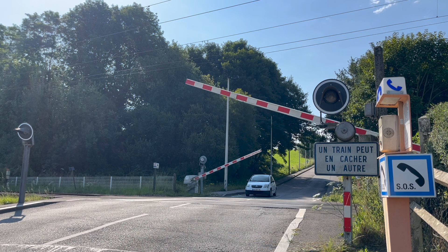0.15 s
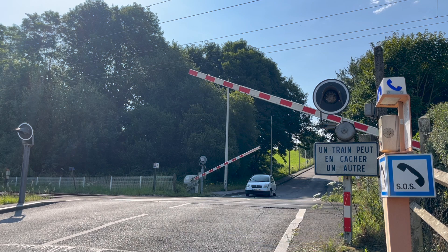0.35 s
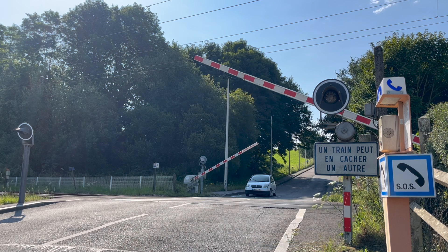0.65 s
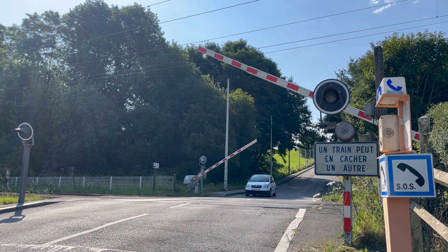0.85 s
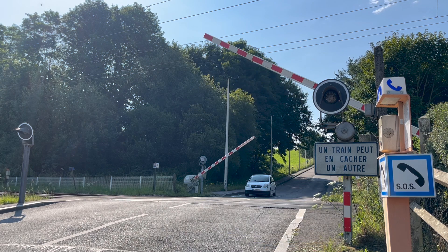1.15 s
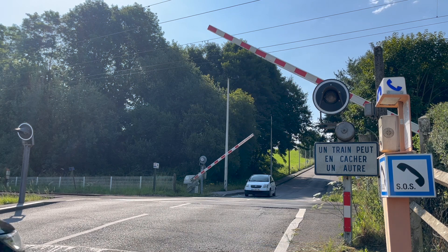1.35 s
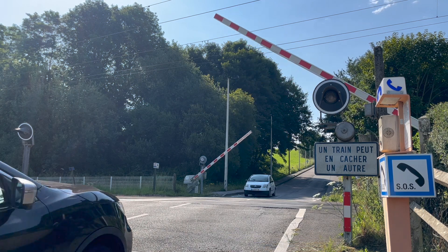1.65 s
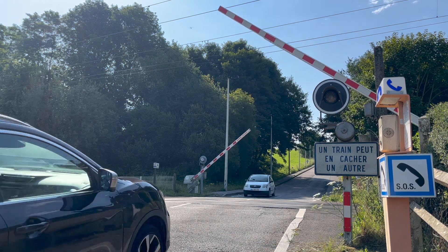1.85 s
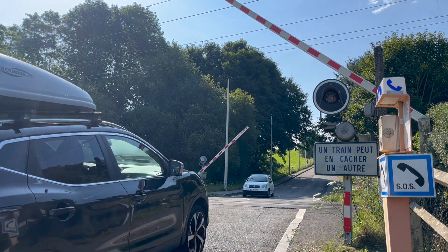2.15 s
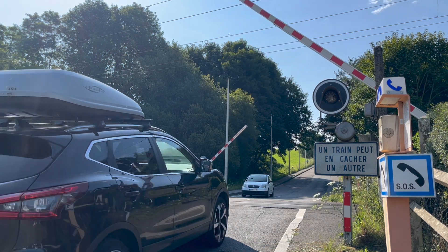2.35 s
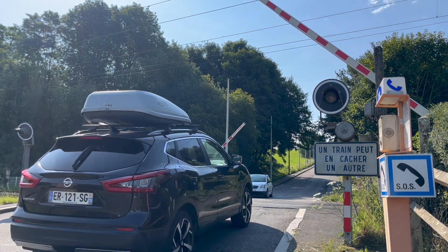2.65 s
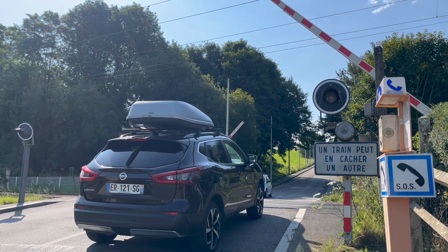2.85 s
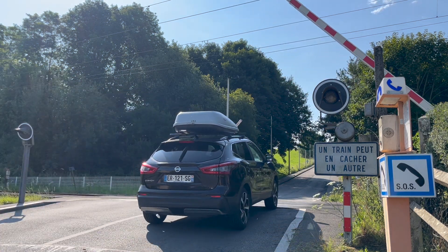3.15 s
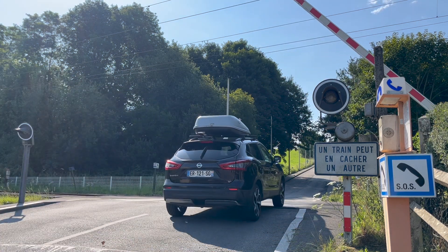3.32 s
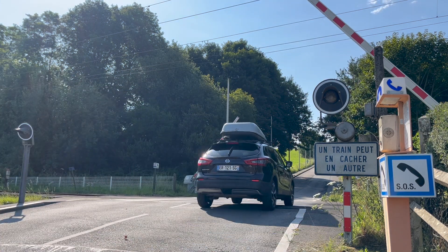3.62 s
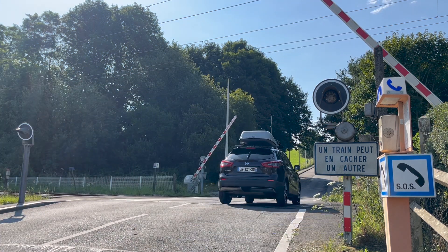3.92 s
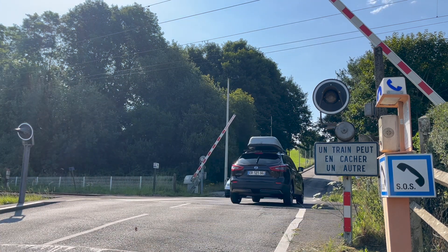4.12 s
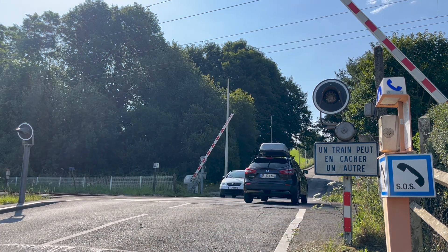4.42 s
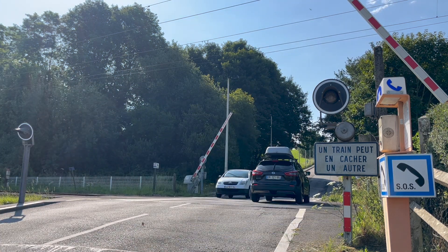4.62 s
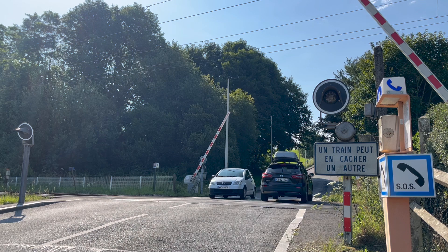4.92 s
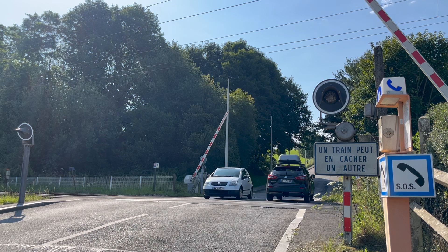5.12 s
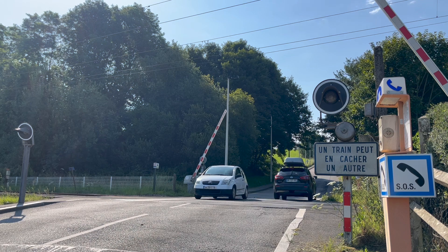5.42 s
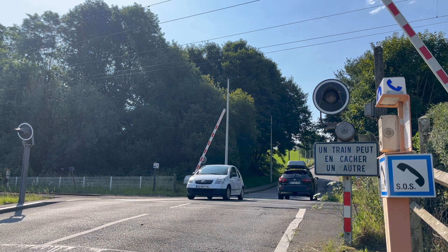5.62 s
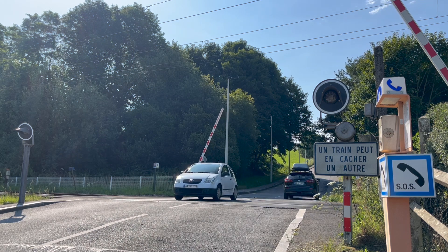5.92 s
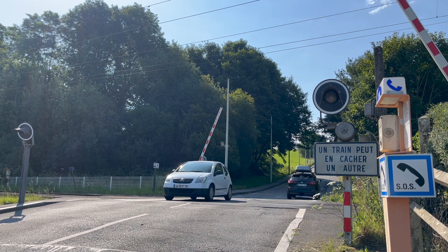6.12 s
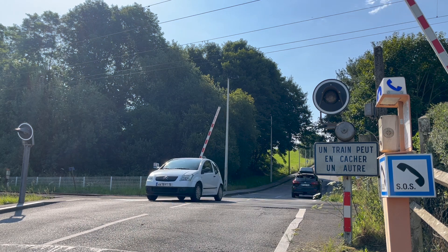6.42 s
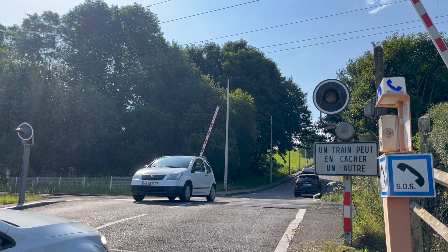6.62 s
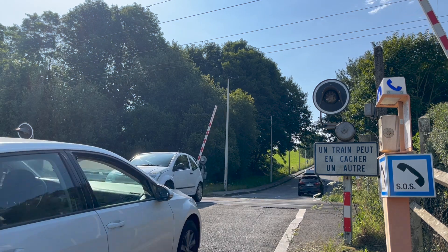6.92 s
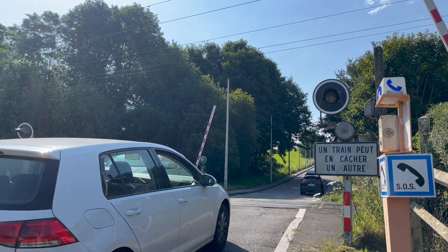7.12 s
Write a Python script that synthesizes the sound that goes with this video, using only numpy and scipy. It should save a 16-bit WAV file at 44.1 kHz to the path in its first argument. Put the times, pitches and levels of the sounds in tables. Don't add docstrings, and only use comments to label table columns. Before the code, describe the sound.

Roadside at a level crossing: an engine accelerates past with hissing tyre roar, then wheels bump heavily on deck and rails as other cars follow.

```python
import sys
import numpy as np
from scipy import signal
from scipy.fft import rfft, irfft, next_fast_len
from scipy.io import wavfile

SR = 44100
rng = np.random.default_rng(int(sys.argv[2]) if len(sys.argv) > 2 else 0)


def nominal_scale(level):
    x = np.asarray(level, float) / 20
    return 10 ** x


def store_pcm(level_fs):
    pcm = np.round(np.clip(level_fs, -1, 1) * 32767).astype(np.int16)
    wavfile.write(sys.argv[1], SR, np.atleast_2d(pcm).T)


N = 320166
STEP = 64

# [f/Hz, side-mid level/dB ahead, the same aside, link ahead/0-1, link aside/0-1, side lead/rad]
PORT_PAIR = [(60, -22, -20.5, .6, .9, 1.5), (140, -20, -13, 0.7, 0.5, 1.5), (370, -9, -2.5, 1, 0.8, 1.5),
             (800, -6, 3.5, 1, 0.5, 1.18), (1260, -1.5, 8, 0, 0.5, 0.9), (1610, 1.5, 7.5, 0, 0.7, 5),
             (1750, -12.5, -4, .3, 0.9, 1.3), (2900, -4, -0.5, .6, 0.6, 1.1),
             (4520, -5, 0.5, 0.82, 0.42, 0.45), (6500, -1.5, -3, 0.15, 0.9, -1.0),
             (7400, 5, 2, 0.4, .5, -1.4), (8300, 2, 0, .5, .5, 2), (9500, -2, -0.5, .5, .5, 1.5),
             (10500, -13, -16, .6, .5, 1.8), (13700, -2, -0.5, .5, .5, -2), (14700, 16, 18, .5, .5, 0)]


def in_time(rows, step=1):
    s, *columns = np.transpose(rows)
    times = np.arange(0, N, step) / SR
    return np.array([np.interp(times, s, c) for c in columns])


def at_hz(points, hz, axis=1):
    points = np.array(points)
    return np.interp(np.log(hz + 1e-9), np.log(points[:, 0]), points[:, axis])


def drift(rate):
    r = np.exp(-2 * np.pi * rate * STEP / SR)
    slow = signal.lfilter([1], [1, -2 * r, r * r], rng.standard_normal(N // STEP + 3001))[3000:]
    return slow / slow.std()


def full_rate(control):
    return np.interp(np.arange(N) / STEP, np.arange(len(control)), control)


def fade(rows, edge_s=0.093):
    t = np.arange(N) / SR
    first, last = rows[0][0], rows[-1][0]
    since_start = t - first + (first < .01)
    until_end = last - t + (last > 7.2)
    return np.clip(np.minimum(since_start, until_end) / edge_s, 0, 1)


def add_at(out, s, event):
    start = int(s * SR)
    out[start:start + len(event)] += event


def orders(rows, wobble_db, stack=((1, 0),), pipe=((1, 0), (2, 0)), wobble_per_s=1.74):
    hz, level_db, *rasp_db = in_time(rows)
    phase = 2 * np.pi * np.cumsum(hz) / SR
    tones = np.zeros(N)
    for k, db in stack:
        tone_db = level_db + db + at_hz(pipe, k * hz)
        tone_db = tone_db + sum(rasp_db) * (k > 3)
        tone_db = tone_db + wobble_db * full_rate(drift(wobble_per_s))
        tones += nominal_scale(tone_db) * np.sin(k * phase + rng.uniform(0, 6.8))
    return np.sqrt(2) * tones * fade(rows), phase


def port_colour(hz):
    # [f/Hz, level/dB]
    mid_null = [(7200, 0.5), (7600, -6.5), (7950, -16), (8850, -15), (9100, -10.5), (9700, -7.5)]
    # [f/Hz, level/dB]
    side_null = [(10800, -0.5), (11150, -16), (11300, -40), (12900, -40), (13100, -9), (13600, -6)]
    mid = nominal_scale(at_hz(mid_null, hz))
    side = nominal_scale(at_hz(PORT_PAIR, hz) + at_hz(side_null, hz))
    return mid, side * np.exp(1j * at_hz(PORT_PAIR, hz, axis=5))


def at_ports(x, aside):
    # [f/Hz, turn/rad]
    ahead_turn = [(60, -0.23), (200, -1.0), (500, 0.26)]
    hz = np.arange(N // 2 + 1) * SR / N
    mid_gain, side_gain = port_colour(hz)
    wider = nominal_scale(at_hz(PORT_PAIR, hz, axis=2) - at_hz(PORT_PAIR, hz))
    turned = side_gain * np.exp(1j * at_hz(ahead_turn, hz))
    mid, ahead, beside = irfft(rfft(x) * np.array([mid_gain, turned, side_gain * wider]), N)
    return np.array([mid, ahead + full_rate(aside) * (beside - ahead)])


def rumble(lumpy_db=-3.0):
    # [t/s, level/dB]
    strength_curve = [(0, -45), (.4, -50), (2.2, -50), (2.7, -45), (3.7, -43), (4.2, -39), (5, -37),
                      (5.4, -38), (6.1, -36), (6.7, -38)]
    # [f/Hz, level/dB per Hz]
    low_colour = [(20, -30), (33, -8), (48, 4.5), (70, 3.5), (100, 2), (150, -16.5), (250, -34)]
    hz = np.arange(N // 2 + 1) * SR / N
    noise = irfft(rfft(rng.standard_normal(N)) * nominal_scale(at_hz(low_colour, hz)) * (hz < 400), N)
    lumps = full_rate(np.clip(drift(9.1), -1.5, 1.5))
    return noise / noise.std() * nominal_scale(in_time(strength_curve)[0] + lumpy_db * lumps)


def traffic():
    # [t/s, tyre level/dB, engine hiss level/dB, engine-bay share/0-1,
    # bearing/0 ahead to 1 left]
    first_pass = [(0, -48.5, -71, 0.92, 1.4), (.27, -47, -70, 1, 1.34), (.5, -45, -65.5, 1, 1.42),
                  (1.0, -44.5, -54.5, 0.35, 1.15), (1.35, -43, -51.5, 0.36, 0.81),
                  (1.85, -40.5, -52, 0.41, 0.25), (2.4, -40.5, -55, 0.38, -0.093),
                  (3.05, -41.5, -58, 0.33, -0.27), (3.7, -46, -65, 0.03, -0.16), (4.4, -52, -75, 0.1, 0.41),
                  (7.26, -68, -85, .3, .2)]
    oncoming_pass = [(0, -80, -88, .4, .6), (3.6, -52, -80, 0.72, 0.43), (4.3, -47.5, -83, 0.39, 0.39),
                     (4.65, -45.5, -77, 0.31, 0.47), (5.15, -44.5, -68.5, 0.36, 0.7),
                     (5.7, -42.5, -67, 0.46, 0.85), (6.1, -44, -66, 0.34, 1), (6.6, -41.5, -64, 0.23, 0.67),
                     (6.95, -41.5, -64, 0.36, 0.33), (7.26, -41, -66, 0.28, .1)]
    follower_pass = [(5.3, -67, -86, 0.55, 0.93), (6.05, -45, -67.5, 0.44, 1),
                     (6.35, -41.5, -57.5, 0.3, 0.82), (6.65, -40, -55.5, 0.25, 0.73),
                     (6.95, -39, -59, 0.29, 0.31), (7.26, -42, -62, 0.066, 0.017)]
    tyre_colours = [
        (1.5, 0, -6, -34),
        (2.5, 0, -6.5, -32),
        (3, 0, -13, -30),
    ]
    hiss_colour = (-17, -11, -10, 0)
    dulling = (0.039, 0.26, 0.4, .9)
    close_db = -39.5
    ridge_bands = [1, 1, 2, 2, 3, 3]
    ridge_strengths = [
        [(-.1, -0.11, 0.3, 0.04, 1, -0.73), (.25, 0.51, 0.091, 0.42, 0.17, 0.25)],
        [(-.05, 0.35, 0.012, -0.62, -0.16, -0.32), (.4, 0.29, 0.22, 0.97, 0.13, .1)],
        [(-.1, .15, .06, -.25, -.4, .05), (.5, .5, .02, 0.04, 0.11, .4)],
    ]
    passes = np.array([in_time(rows, STEP) for rows in (first_pass, oncoming_pass, follower_pass)])
    tyre_db, hiss_db, bay, bearing = passes.transpose(1, 0, 2)[:, :, None]
    distance_db = np.array(dulling)[:, None] * (tyre_db - close_db)
    tyres = tyre_db + np.array(tyre_colours)[:, :, None] + distance_db
    power = nominal_scale(2 * tyres) + nominal_scale(2 * (hiss_db + np.array(hiss_colour)[:, None]))
    share = power / power.sum(0)
    ahead, left = np.transpose(ridge_strengths, (1, 0, 2))[..., None]
    strength = (share[:, ridge_bands] * (ahead + left * bearing)).sum(0)
    levels_db = 10 * np.log10(power.sum(0))
    return levels_db, (share * bay)[:, 1].sum(0), (share * bearing)[:, 1].sum(0), strength


def filled(points):
    return [p for p in points if not 7400 < p[0] < 9300]


def gritty_noise(size, grit_db=6.0, grit_per_s=49.0):
    struck = rng.random(size) < grit_per_s / SR
    force = nominal_scale(grit_db + 5.3 * np.minimum(rng.exponential(1, size), 2))
    grit = struck * force * rng.choice([-1, 1], size)
    return rng.standard_normal((2, size)) + grit * [[1], [0]]


def roar(firing, aside, bay, levels_db, strength, patchy_db=1.5, gust_db=-0.05, flutter_db=1.0,
         tread_db=1.7, throb=.05):
    # [f/Hz, level/dB per Hz]
    ahead_colour = [(88, 14.5), (150, 0.5), (172, -3.5), (553, -12.5), (1040, -14.5), (1500, -20),
                    (1890, -21), (3910, -30.5), (7220, -44.5), (7650, -56), (8110, -103), (9090, -53),
                    (11000, -31.5), (13600, -32.5), (14700, -35)]
    # [f/Hz, level/dB per Hz]
    bay_colour = [(88, -74), (150, 6), (407, -13), (493, -16), (1170, -34.5), (1850, -29.5), (2560, -42),
                  (4830, -37), (5850, -33.5), (7510, -25), (8420, -85), (9090, -59), (11200, -30),
                  (13300, -23), (14700, -65)]
    # [low f/Hz, high f/Hz]
    roar_bands = [(150, 600), (600, 2500), (2500, 7500), (9000, 14500)]
    # [f/Hz, width/octaves]
    ridges = [(780, 0.81), (1860, 0.084), (2800, 0.19), (6000, 0.17), (11000, 0.045), (12900, 0.037)]
    # [t/s, f/Hz, share cancelled/0-1]
    ground_dip = [(0, 1116, 0.1), (.7, 1250, 0), (.95, 1430, 0.4), (2.0, 1575, 0.52), (2.4, 1220, 0),
                  (5.5, 1220, 0.57), (6.2, 1260, 0.5), (6.6, 1510, 0.4), (7.26, 1500, 0.3)]
    dip_octaves = 0.12
    # [t/s, f/Hz, added share of amplitude]
    swells = [
        [(.8, 562.5, 0.38), (.95, 620, 0.58), (1.07, 746, 0.4), (1.25, 800, 0.021)],
        [(.3, 1750, 0), (.6, 1800, 0.47), (1.05, 2000, 0.55), (1.3, 1794, .2), (1.6, 1800, .5), (1.9, 2070, .5),
         (2.15, 2550, .5), (2.45, 2600, 0.27), (2.8, 2900, 0.45), (3.0, 2950, 0)],
        [(2.75, 1247, 0.11), (2.88, 1090, 0.24), (3.15, 946, 0.97), (3.3, 904, 0.075)],
        [(4.45, 2125, 0.2), (4.62, 2137, .7), (5.15, 2150, 0.44), (5.35, 2020, 0.04)],
        [(5.0, 3020, 0), (5.2, 3050, 0.45), (5.45, 3000, .8), (5.75, 3000, 0.15)],
        [(6.3, 4200, 0), (6.5, 4220, .6), (6.75, 4300, 0)],
        [(5.3, 1900, 0), (5.6, 1850, 0.28), (6.15, 2000, 0.43), (6.7, 2000, 0.27), (7.1, 2050, .3),
         (7.26, 2020, .2)],
        [(1.9, 6400, 0), (2.1, 6300, 0.36), (2.65, 6395, .4), (3.1, 6404, 0.068)],
        [(0, 5600, 0.36), (.3, 5570, .3), (.55, 5400, 0.33), (.95, 5600, 0.28), (1.2, 5600, 0)],
    ]
    swell_octaves = [0.44, 0.11, 0.22, .08, 0.056, 0.072, 0.066, .08, .1]

    size = next_fast_len(N)
    hz = np.arange(size // 2 + 1) * SR / size
    shared, own = rfft(gritty_noise(size)) * nominal_scale(at_hz(filled(ahead_colour), hz))
    mid_gain, side_gain = port_colour(hz)
    layers = np.array([shared * mid_gain, shared * side_gain, own * side_gain])
    centres = 100 * 2 ** (np.arange(58) / 8)
    tents = [np.clip(1 - np.abs(8 * np.log2(hz / c + 1e-9)), 0, 1) for c in centres]
    bay_over_ahead = at_hz(filled(bay_colour), centres) - at_hz(filled(ahead_colour), centres)
    turn_db = np.outer(bay_over_ahead, bay)

    power = np.array([2 * np.sum(np.abs(layers[0]) ** 2 * tent) / size ** 2 for tent in tents])
    power = power[:, None] * nominal_scale(2 * turn_db)
    trim_db = []
    for db, (lo, hi) in zip(levels_db, roar_bands):
        inside = (centres > lo) & (centres < hi)
        trim_db.append(db - 10 * np.log10(power[inside].sum(0)))
    place = np.interp(np.log(centres), np.log(np.prod(roar_bands, 1)) / 2, np.arange(4))

    ridge_hz, ridge_width = np.transpose(ridges)
    strength = np.clip(strength, -.7, 3)
    dip_hz, dip = in_time(ground_dip, STEP)
    swell_hz, swell = np.transpose([in_time(rows, STEP) for rows in swells], (1, 0, 2))
    gust, flutter, tread = drift(10), drift(56), drift(54.0)
    out = np.zeros((2, N))
    for c, tent, turn, p in zip(centres, tents, turn_db, place):
        trim = sum(max(0, 1 - abs(p - k)) * trim_db[k] for k in range(4))
        db = turn + trim + gust_db * gust + patchy_db * drift(16.8)
        db = db + flutter_db * flutter * (c > 3500) + tread_db * tread * (1500 < c < 2600)
        ridge = np.exp(-(np.log2(c / ridge_hz) / ridge_width) ** 2) @ strength
        cancelled = np.clip(dip, 0, .9) * np.exp(-(np.log2(c / dip_hz) / dip_octaves) ** 2)
        near_swell = np.exp(-(np.log2(c / swell_hz) / np.c_[swell_octaves]) ** 2)
        swollen = (np.clip(swell, 0, 3) * near_swell).sum(0)
        db = db + 20 * np.log10(1 + ridge) + 20 * np.log10(1 - cancelled) + 20 * np.log10(1 + swollen)
        link = at_hz(PORT_PAIR, c, axis=3) * (1 - aside) + at_hz(PORT_PAIR, c, axis=4) * aside
        link = np.clip(link, 0, .99)
        wide = nominal_scale(db + aside * (at_hz(PORT_PAIR, c, axis=2) - at_hz(PORT_PAIR, c)))
        mid, linked, free = irfft(layers * tent, size)[:, :N]
        out[0] += full_rate(nominal_scale(db)) * mid
        out[1] += full_rate(wide * link) * linked + full_rate(wide * np.sqrt(1 - link ** 2)) * free
    return out * (1 + throb * np.sin(firing))


def cracks(t60=.04, width=1.9):
    # [t/s, peak level/dB, centre f/Hz]
    snap_events = [(1.949, -43, 5000), (2.84, -47, 7000), (3.06, -47, 7000), (3.11, -47, 7500),
                   (3.18, -47, 7500), (3.319, -48, 7500), (3.519, -50, 7000), (3.829, -50, 8000),
                   (3.357, -34, 1100), (3.872, -36, 1200), (3.894, -42, 3800), (4.097, -44, 3200),
                   (4.169, -36, 600), (4.221, -42, 3500), (4.587, -31, 1500), (4.586, -41, 4300),
                   (4.611, -35, 2500), (4.634, -40, 2000), (4.67, -40, 1800), (5.024, -52, 8000),
                   (6.889, -45, 7000), (6.98, -20, 1000), (6.982, -30, 1700), (7.1, -29, 1200),
                   (7.12, -42, 6000)]
    out, t = np.zeros(N), np.arange(int(.06 * SR)) / SR
    for s, db, hz in snap_events:
        edges = [hz / width, min(hz * width, .45 * SR)]
        band = signal.butter(3, edges, "band", fs=SR, output="sos")
        burst = signal.sosfilt(band, rng.standard_normal(len(t))) * np.minimum(t / .001, 1)
        add_at(out, s, nominal_scale(db - 7 - 60 * t / t60) * burst / burst.std())
    return out


def soft_cycles(t, hz, length):
    return (t / length) ** 2 * np.exp(2 - 2 * t / length) * np.sin(2 * np.pi * hz * t)


def thumps(slap_db=-9, slap_ratio=2.56, thump_s=0.035):
    # [t/s, peak level/dB, f/Hz]
    deck_hits = [(2.29, -37, 70), (2.888, -21, 72.4), (3.0, -42, 84.8), (3.38, -27, 55), (3.9, -30, 50),
                 (4.421, -27, 70), (5.001, -26, 45), (5.38, -30, 49.7), (5.9, -33, 60), (6.1, -28, 65),
                 (3.247, -22.5, 75), (3.755, -20.5, 64.7), (4.031, -25, 62.45), (4.089, -27, 75),
                 (4.3, -35, 68.4), (4.549, -23, 84.4), (4.578, -23.5, 85.5), (4.612, -25, 69.4),
                 (4.647, -20.5, 57.6), (4.68, -21, 67), (4.815, -22, 49.7), (5.141, -21.5, 57.5),
                 (5.219, -28, 65), (5.295, -19, 61.9), (5.475, -23, 104), (5.563, -22, 59.2),
                 (5.661, -18, 72.3), (6.297, -25.5, 97), (6.357, -21, 93), (6.391, -15.5, 74),
                 (6.431, -20.5, 67), (6.465, -25, 99), (6.514, -27, 76.5), (6.611, -15.5, 59.6),
                 (6.653, -25, 51.3), (6.719, -16.5, 73), (6.807, -24.5, 60), (6.994, -23, 53.8),
                 (7.087, -19, 51.4)]
    out, t = np.zeros(N), np.arange(int(.15 * SR)) / SR
    for s, db, hz in deck_hits:
        blow = soft_cycles(t, hz, 0.34 * thump_s)
        slap = soft_cycles(t, slap_ratio * hz, 0.11 * thump_s)
        add_at(out, s, nominal_scale(db) * (blow + nominal_scale(slap_db) * slap))
    return out


def knocks():
    # [t/s, peak level/dB, f/Hz, t60/s]
    dull_knocks = [(.923, -35, 500, .05), (.949, -31, 482, .07), (1.0, -32, 760, .06), (1.028, -31, 600, .06),
                   (1.065, -33, 820, .05), (1.087, -32, 650, .06), (1.164, -35, 633, .05),
                   (3.361, -26, 500, .12), (3.652, -27, 400, .04), (3.872, -24, 450, .04),
                   (3.899, -30, 520, .035), (4.098, -29, 355, .04), (4.169, -25, 520, .045),
                   (4.171, -25, 300, .04), (4.219, -32, 353, .08), (4.587, -29, 790, .06),
                   (4.894, -33, 528, .08), (4.919, -32, 546, .09), (5.48, -29, 195, .1),
                   (5.572, -29, 175, .1), (5.603, -31, 716, .1), (6.188, -27, 570, .09),
                   (6.395, -24, 280, .06), (6.515, -27, 358, .07), (6.981, -24, 360, .08)]
    out, t = np.zeros(N), np.arange(int(.15 * SR)) / SR
    onset = np.minimum(t / 0.0029, 1)
    for s, db, hz, t60 in dull_knocks:
        ring = np.sin(2 * np.pi * hz * t) + 0.5 * np.sin(2 * np.pi * 1.1 * hz * t)
        add_at(out, s, nominal_scale(db - 5.5 - 60 * t / t60) * onset * ring)
    return out


def whines():
    # [t/s, f/Hz, level/dB]
    whine_curves = [
        [(1.5, 495, -66), (1.75, 500, -46.5), (2.0, 519.4, -48), (2.2, 512, -50)],
        [(2.85, 755, -51), (3.2, 775, -56), (3.5, 785, -55), (3.8, 771, -55)],
        [(2.45, 2617, -62), (2.62, 2730, -58), (2.85, 2930, -62)],
        [(4.65, 548, -52), (4.95, 537, -53.5), (5.2, 548, -69)],
        [(6.2, 642.5, -47), (6.5, 661, -50), (6.8, 666, -51), (7.15, 690, -64)],
    ]
    return sum(orders(rows, wobble_db=3.0, wobble_per_s=20.0)[0] for rows in whine_curves)


def follower_engine():
    # [t/s, firing f/Hz, level/dB]
    third_run = [(5.2, 61.96, -36), (5.8, 58.52, -45), (6.4, 58, -32.5), (6.75, 59.96, -29),
                 (6.9, 60.95, -36.5), (7.26, 63.6, -36)]
    # [multiple, level/dB]
    third_stack = [(1, 0.5), (2, -9)]
    return orders(third_run, wobble_db=-0.5, stack=third_stack)[0]


def oncoming_engine():
    # [t/s, firing f/Hz, level/dB, intake rasp on the upper multiples/dB]
    oncoming_run = [(1.2, 43, -52, -8), (1.7, 44.52, -48, -8), (2.9, 47.3, -47, -2), (3.4, 46.72, -44, -1),
                    (3.9, 48, -46, 4), (4.6, 49.6, -45, 2.5), (5.2, 49.88, -44.5, 0),
                    (5.6, 50.07, -43, -10), (6.1, 50.6, -39.5, -5.5), (6.6, 49.56, -45, -4),
                    (6.9, 48.64, -47, -3), (7.26, 49.2, -37.5, -3)]
    # [multiple, level/dB]
    oncoming_stack = [(1, -1), (2, -0.5), (3, -5.5), (4, -5)]
    return orders(oncoming_run, wobble_db=0.0, stack=oncoming_stack)[0]


def first_engine():
    # [t/s, firing f/Hz, effort level/dB, intake rasp on the upper multiples/dB]
    first_run = [(0.0, 44.07, -40.5, 6), (0.26, 40.35, -41, 7), (0.5, 46.96, -34.5, 1.5),
                 (.72, 50.16, -36.5, -2), (0.99, 53.1, -34.5, -3.5), (1.5, 55, -33.5, -5.5),
                 (2.0, 57.6, -33.5, -7), (2.44, 62.3, -34, -7), (3.03, 72.3, -33.5, -12),
                 (3.15, 72.2, -36.5, -2), (3.45, 75.5, -39, -12), (3.7, 74, -40.5, -3),
                 (4.06, 69.2, -43, -2), (4.5, 56.7, -47, 1)]
    # [multiple, level/dB]
    first_stack = [(1, -0.5), (2, 0), (3, -8.5), (4, -6.5), (5, -16), (6, -18), (1.5, -13), (2.5, -21)]
    # [f/Hz, level/dB]
    exhaust_pipe = [(42, 1), (52, 8.5), (59, -2), (72, -2), (95, 1.5), (140, -0.5), (165, -4), (220, -5)]
    return orders(first_run, wobble_db=-0.73, wobble_per_s=5.5, stack=first_stack, pipe=exhaust_pipe)


def scene():
    levels_db, bay, aside, strength = traffic()
    engine, firing = first_engine()
    engines = engine + oncoming_engine() + follower_engine()
    compact = rumble() + cracks() + thumps() + knocks() + whines() + engines
    road = roar(firing, aside, np.clip(bay, 0, 1.2), levels_db, strength)
    mid, side = at_ports(compact, aside) + road
    return np.array([mid + side, mid - side])


def low_pass(x):
    return signal.sosfilt(signal.butter(12, 14840, fs=SR, output="sos"), x)


def record(dry):
    low_cut = signal.butter(2, 30, "high", fs=SR, output="sos")
    top_cut = signal.cheby2(12, 60, 15600, fs=SR, output="sos")
    mix = signal.sosfilt(np.vstack([low_cut, top_cut]), dry)
    return low_pass(mix)


dry = scene()
out = record(dry)
store_pcm(out)
```